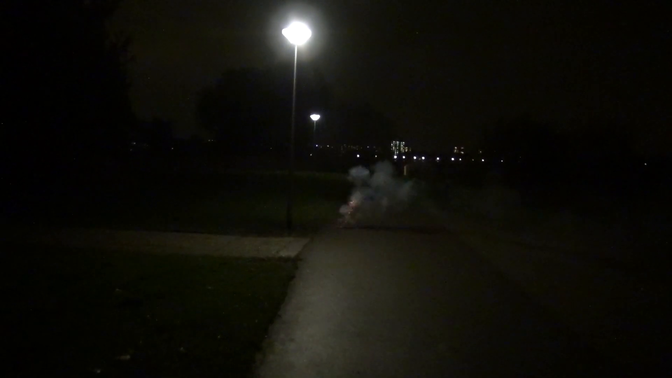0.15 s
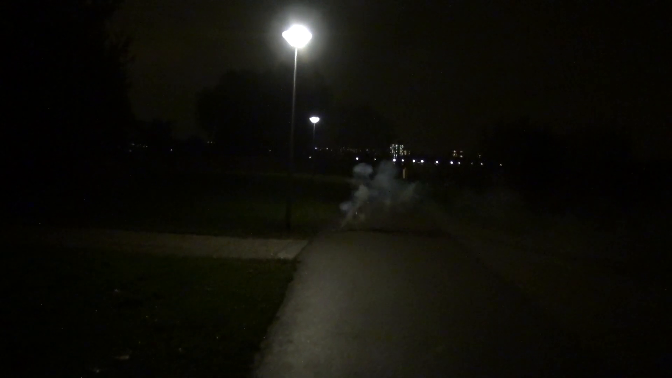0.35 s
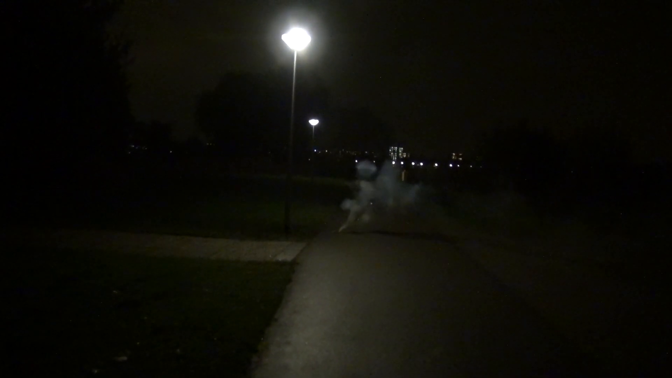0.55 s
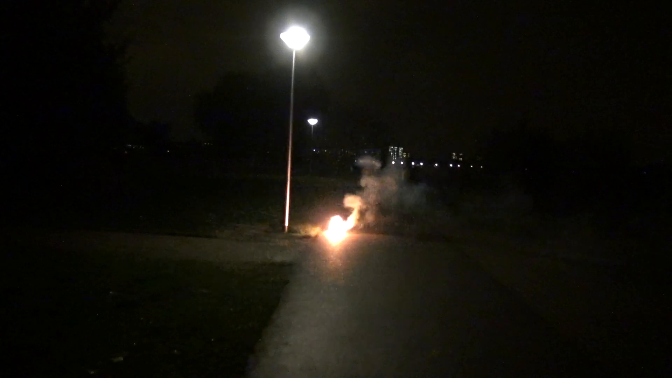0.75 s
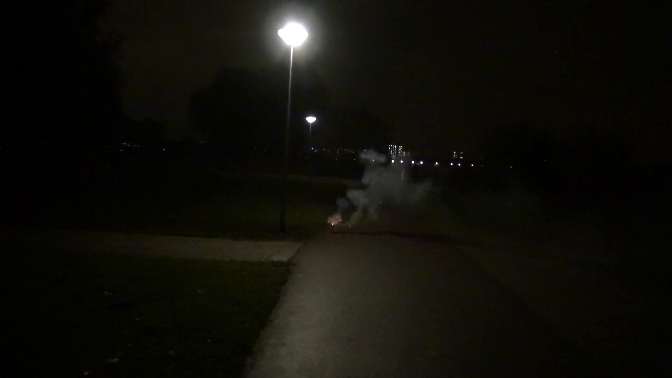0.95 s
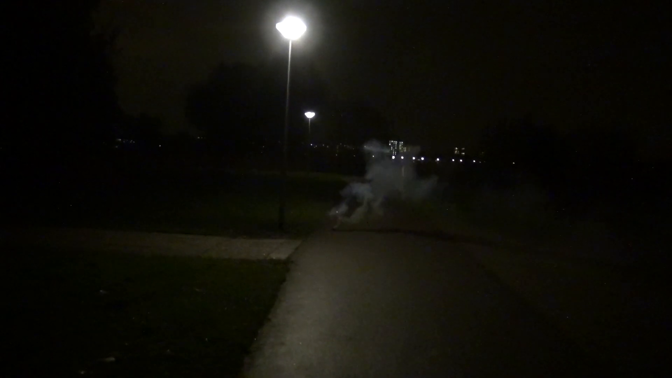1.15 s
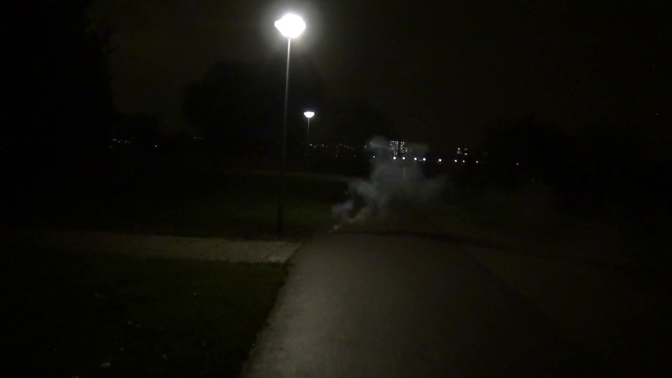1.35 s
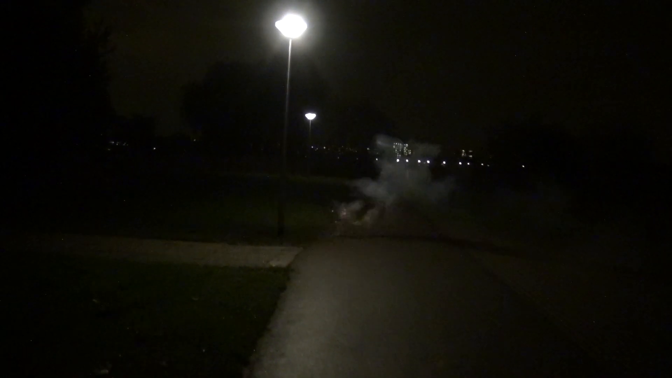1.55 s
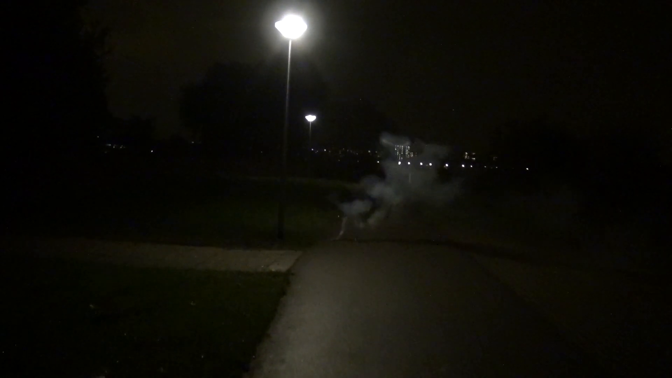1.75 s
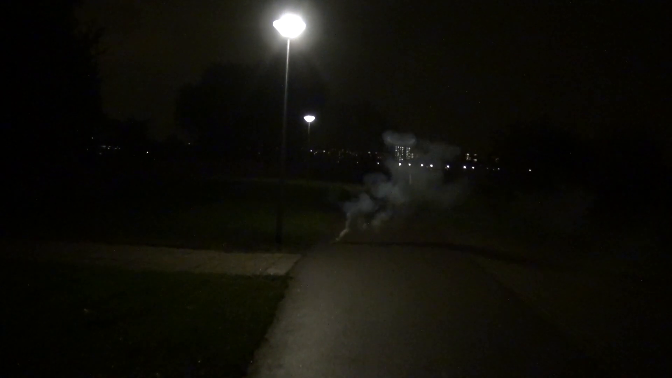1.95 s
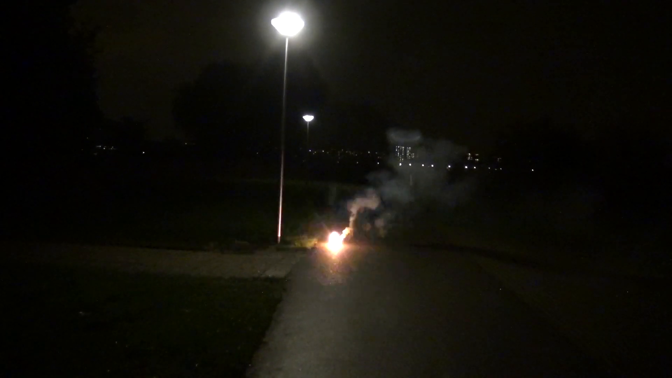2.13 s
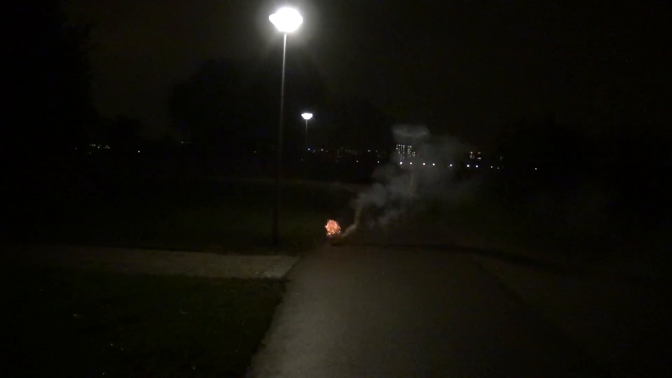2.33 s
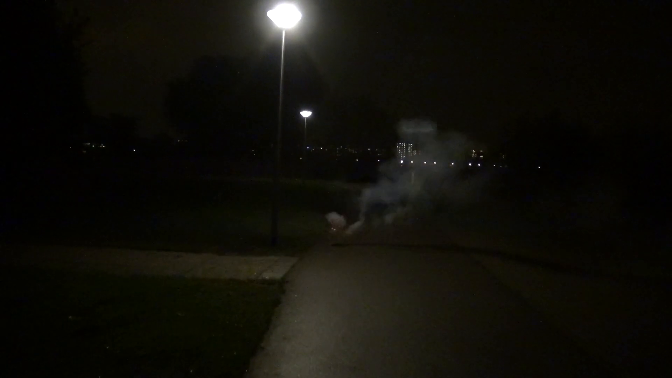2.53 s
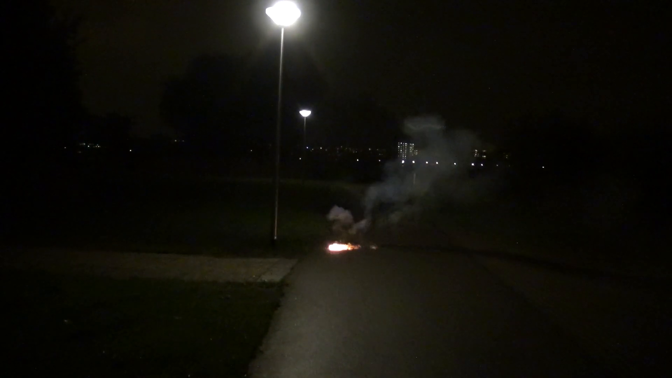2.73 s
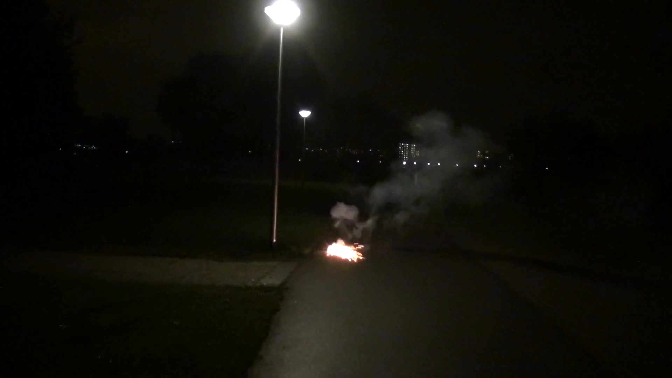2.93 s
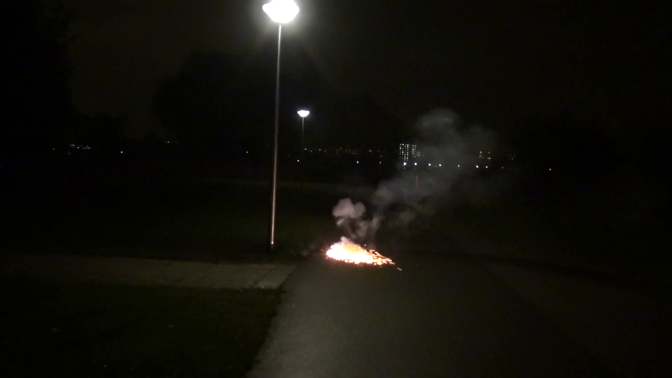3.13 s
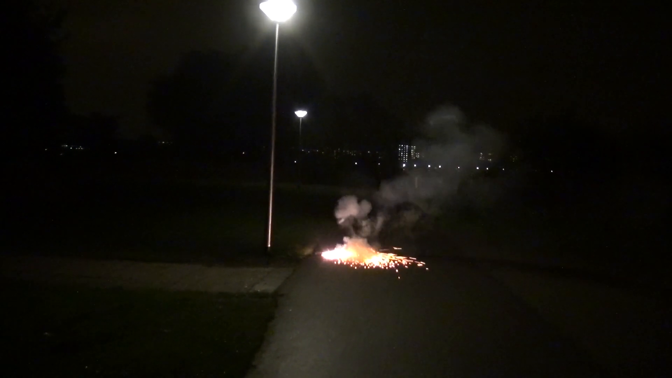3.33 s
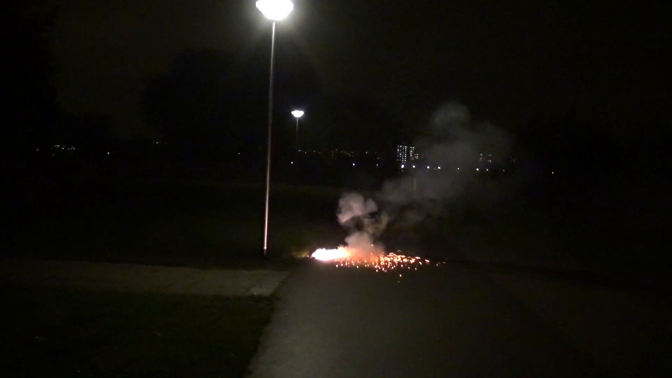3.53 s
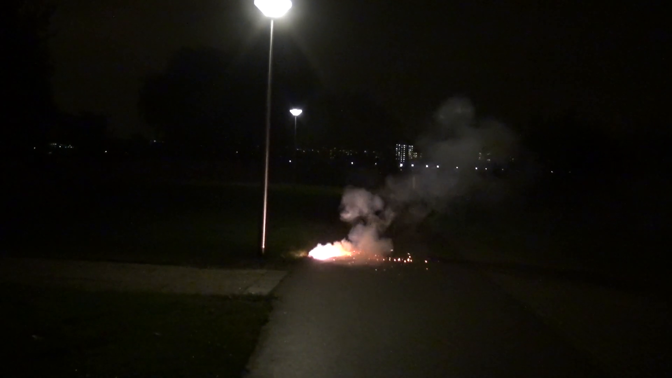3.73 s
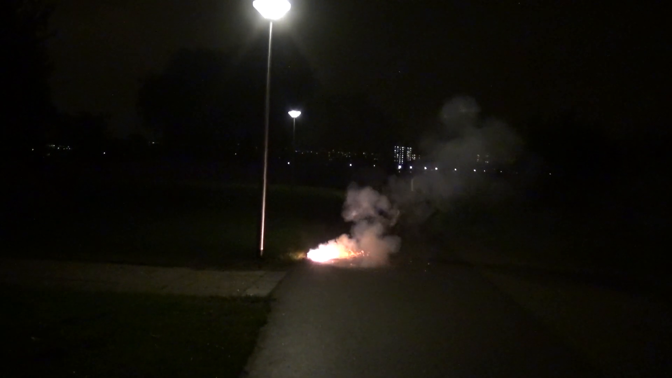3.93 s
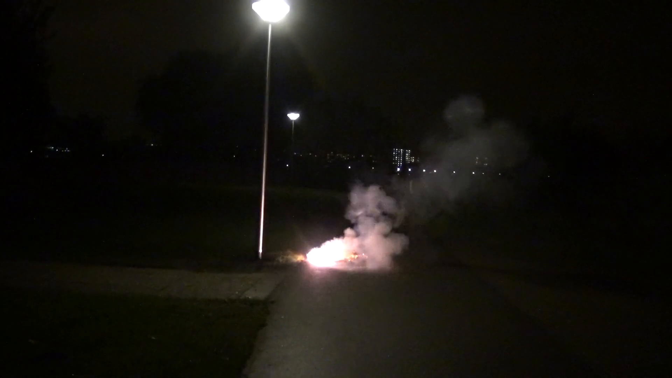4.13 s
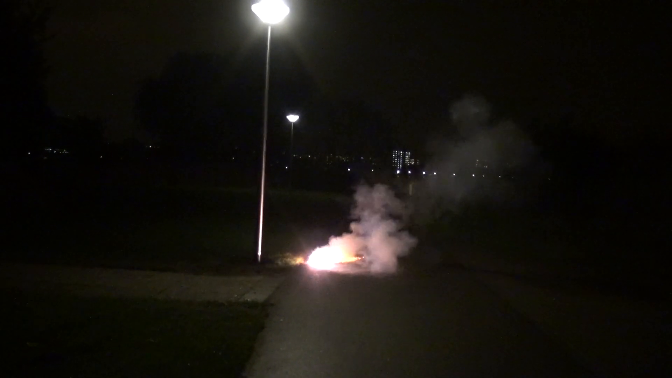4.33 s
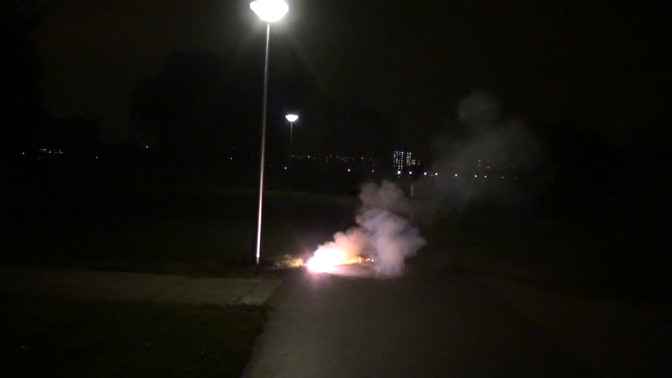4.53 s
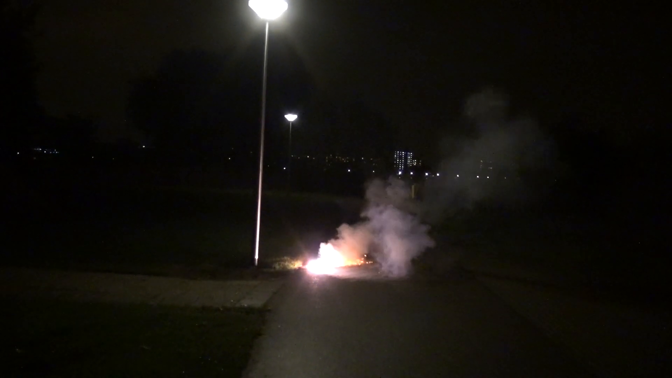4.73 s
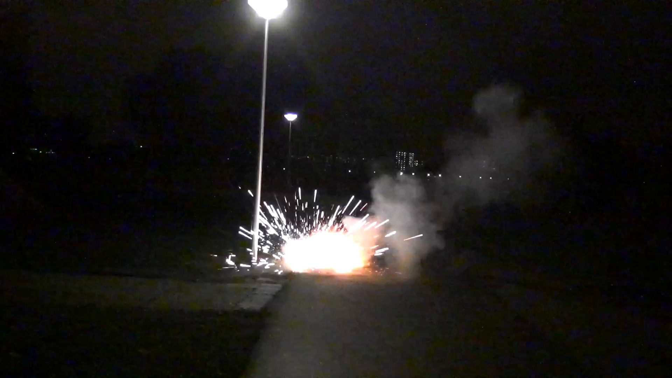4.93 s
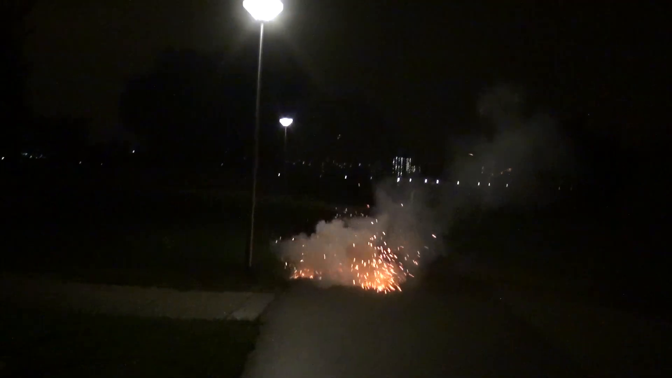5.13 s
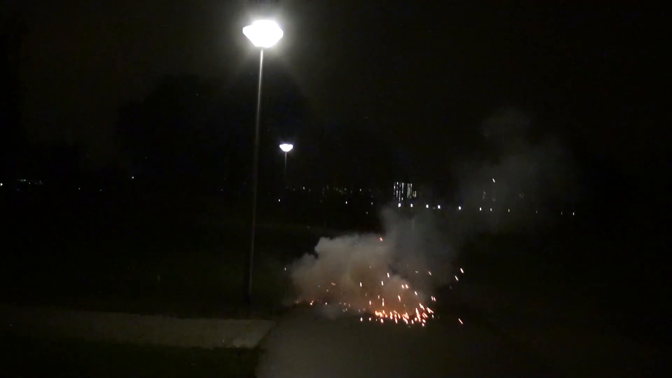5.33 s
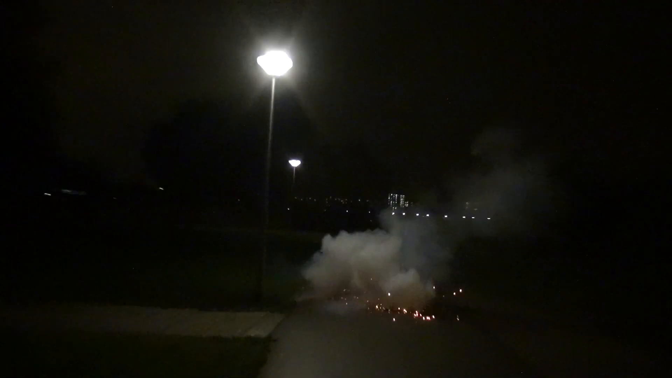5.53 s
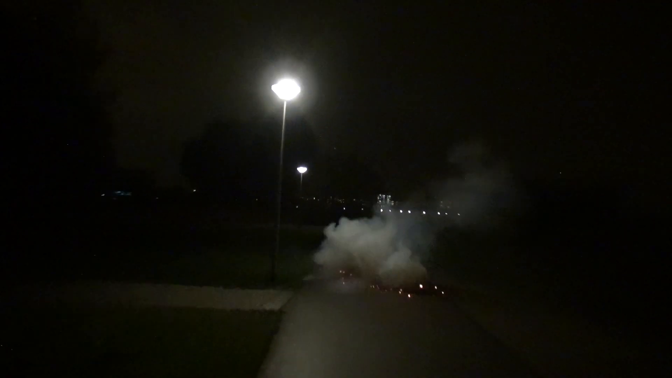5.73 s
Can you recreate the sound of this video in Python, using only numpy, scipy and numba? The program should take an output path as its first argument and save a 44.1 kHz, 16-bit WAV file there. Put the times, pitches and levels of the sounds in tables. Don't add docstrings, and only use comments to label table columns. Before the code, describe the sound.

An open park path at night, heard by a stereo microphone some way off, with low, bassy distant town hum. The recording opens in the echo tail of a pop just gone. Hard, dry cracks follow at about 0.8, 1.5 and 2.2 seconds, the 1.5 one a bit duller and thumpier; each returns as a dense flutter from posts and trees, then fainter, duller slaps from far buildings. At 2.7 a lighting crack and snap start a burning jet: a brief hiss, then a fluttering mid-low roar swelling from 3.0 to 3.4 with deep coughing puffs and spitting hiss. By 3.6 it sinks to a quiet burn, with tiny bright snaps around 4.1, 4.3 and 4.7. A water bird gives a short throaty falling croak at 4.2. At 5.0 a huge clipped blast hits, the level ducks, and echoes roll, surfacing as the gain recovers, fading to hum by 6 seconds.

```python
import sys
import numpy as np
from scipy import signal
from scipy.fft import rfft, irfft
from scipy.io import wavfile
from scipy.ndimage import uniform_filter1d
from numba import njit

SR = 44100
rng = np.random.default_rng(int(sys.argv[2]) if len(sys.argv) > 2 else 0)


def to_wav(s):
    ch = np.atleast_2d(s).T
    pcm = np.round(np.clip(ch, -1, 1) * 32767)
    wavfile.write(sys.argv[1], SR, pcm.astype(np.int16))


def convert_level_to_amplitude(level_db):
    exponent = np.asarray(level_db, float) / 20
    return 10 ** exponent


N = 254898
SPREAD = np.array([[1], [-1]])


def level(x, db):
    return x * convert_level_to_amplitude(db) / np.sqrt(np.mean(x ** 2))


def curves(table, count=N):
    s, *columns = np.transpose(table)
    return [np.interp(np.arange(count) / SR, s, c) for c in columns]


def band(x, low_hz, high_hz, order=1):
    edges_hz = [low_hz, min(high_hz, 0.45 * SR)]
    return signal.sosfilt(signal.butter(order, edges_hz, "band", fs=SR, output="sos"), x)


def coloured(*spectra):
    log_hz = np.log(np.maximum(np.fft.rfftfreq(N, 1 / SR), 1))
    db = 0
    for spectrum in spectra:
        knot_hz, knot_db = np.transpose(spectrum)
        db = db + np.interp(log_hz, np.log(knot_hz), knot_db)
    return irfft(rfft(rng.standard_normal(N)) * convert_level_to_amplitude(db), N)


def walk(rate_hz):
    hold = int(SR / rate_hz)
    steps = np.repeat(rng.standard_normal(N // hold + 1), hold)
    return 0.59 * uniform_filter1d(uniform_filter1d(steps, hold), hold)[:N]


def sides(pan_db):
    return convert_level_to_amplitude(np.array([pan_db, -pan_db]) / 2)


def shock(decay_ms):
    t = np.arange(1024) / (decay_ms * SR / 1000)
    return (1 - t) * np.exp(-t)


def shocks():
    # (time [s], direct level [dB], level sent round the place [dB], crack length [ms], thump level [dB])
    charges = [
        (-.0615, 14, -4.5, 0.092, -25),
        (0.8216, 13, -1.5, 0.11, -31.5),
        (1.5222, 9, -8, 0.12, -17),
        (2.224, 13.5, -1.5, 0.1, -30),
        (2.7195, 12.5, -17.5, .2, -18),
        (4.997, 55.5, 23, 0.2, -10.5),
    ]
    # (frequency [Hz], width [Hz], level [dB])
    heave_modes = [(196.4, 180, 3.5), (504, 790, 4.5)]
    lead = SR // 10
    direct, (cracks, thumps) = np.zeros((2, 2, N + lead))
    ms = np.arange(1024) * 1000 / SR

    boom_db, boom_hz, boom_ms = 5.5, 126.3, 3.07
    boom = -convert_level_to_amplitude(boom_db) * ms * np.exp(-ms / boom_ms) * np.cos(2 * np.pi * boom_hz * ms / 1000)

    heave = 0
    for hz, width_hz, db in heave_modes:
        decay = np.exp(-np.pi * width_hz * ms / 1000)
        heave = heave + convert_level_to_amplitude(db) * decay * np.sin(2 * np.pi * hz * ms / 1000)
    heave = band(heave, 96, 4600, order=2)

    for s, direct_db, sent_db, crack_ms, thump_db in charges:
        swing_hz = 1256 * (0.0937 / crack_ms) ** 0.47
        glide_ms, decay_ms = 1.51 * (swing_hz / 1000) ** 3.4, 1.06 * 1000 / swing_hz
        phase = 2 * np.pi * swing_hz / 1000 * glide_ms * np.log(1 + ms / glide_ms)
        swing = convert_level_to_amplitude(-4.5) * np.exp(-ms / decay_ms) * np.sin(phase + 2.0)

        tearing = rng.standard_normal(1024) + 0.24 * rng.standard_normal((2, 1024))
        rasp = convert_level_to_amplitude(-8) * np.exp(-ms / 0.43) * band(tearing, 310, 5500) * 2

        at = int(s * SR) + lead
        here = slice(at, at + 1024)
        push_db = sent_db + thump_db
        direct[:, here] += convert_level_to_amplitude(direct_db) * (shock(crack_ms) + swing + rasp)
        direct[:, here] += convert_level_to_amplitude(push_db) * boom - convert_level_to_amplitude(push_db + 9.5) * heave * np.exp(-ms / 6.0)
        cracks[here] += convert_level_to_amplitude(sent_db) * shock(crack_ms)
        thumps[here] += convert_level_to_amplitude(push_db + 6.0) * heave

    crack_back, thump_back = place()
    echoes = signal.fftconvolve(cracks[None], crack_back, axes=1)
    echoes = echoes + signal.fftconvolve(thumps[None], thump_back, axes=1)
    return (direct + echoes[:, :N + lead])[:, lead:]


def place():
    # (delay [s], crack [dB], thump [dB], left minus right [dB], highest frequency [Hz])
    near = [(.0033, 2.5, 7.5, 5.5, 4000), (.0124, 0, -7, -4, 7300), (.016, -5.5, -37, -6, 7100),
            (.0227, 0, -9.5, -4, 3500), (.0355, -40, 2.5, -11, 4100), (0.04, -5, -18, 31, 4990),
            (.047, -11.5, -4, 29, 2520), (.063, -11, -30, -6, 3900), (0.081, -4.5, 5, 19, 3800),
            (.084, 3, -41, 11.5, 4560), (0.086, -32, 7.5, 17, 3000), (0.0959, -2, 2, -6, 3600),
            (.1042, -37, -17, -4, 7500), (0.112, -32, -6, 27, 5050), (.146, -27, -27, 34.5, 3400),
            (0.1502, -8, -53, 6, 7600), (0.181, -8, -38.5, 10.5, 1540), (0.2027, -18, -42, 13, 5840),
            (0.2194, -25, -50, 14, 4730)]
    # (delay [s], crack [dB], thump [dB])
    buildings = [(.331, -29, -20), (0.345, -50.5, -11.5), (0.361, -20, -16.5), (0.396, -49, -23),
                 (.403, -25, -12.5), (.429, -28, -24), (.465, -34.5, -40), (.502, -33.5, -18),
                 (.5455, -33.5, -56), (.634, -35, -36), (.670, -36.5, -27.5)]
    far = []
    for s, crack_db, thump_db in buildings:
        high_hz = 900 + 3160 * np.exp((0.36 - s) / 0.099)
        far.append((s, crack_db, thump_db, -0.5, high_hz))

    crack, thump = scatter(size=SR)
    for s, crack_db, thump_db, pan_db, high_hz in list(near) + far:
        ms = s * 1000
        shared, own = rng.standard_normal(1024), rng.standard_normal((2, 1024))
        smear = np.exp(-np.arange(1024) / (8 + 0.55 * ms)) * 0.24 * (shared + 0.7 * own)
        smear[:, 0] = 1 / (1 + ms / 90)
        face = band(smear, 440, high_hz, order=2) * np.sqrt(8000 / high_hz)
        at = int(ms * SR / 1000)
        crack[:, at:at + 1024] += convert_level_to_amplitude(crack_db) * sides(pan_db)[:, None] * face
        thump[:, at] += convert_level_to_amplitude(thump_db) * sides(0.58 * pan_db)
    return crack, thump


def scatter(size):
    # (delay [s], density [dB])
    density = [(0, -16), (.028, -29.5), (.04, -20), (.09, -21.5), (.2, -30), (.33, -41.5), (.375, -39),
               (.58, -44.5), (.68, -51.5)]
    # (frequency [Hz], level [dB])
    foliage = [(300, -25), (600, -1), (1200, -0.5), (2400, -1), (4800, -2.5), (8000, 0), (12000, -5.5),
               (17000, -6)]
    s = np.arange(size) / SR
    middle_db = curves(density, count=size)[0]
    air_loss_db = 2.5 + 24.5 * s ** 2

    verge_db, verge_fall_db_s, trees_s, bass_db = -11, 2500, 0.062, -10.5
    bass = convert_level_to_amplitude(verge_db - verge_fall_db_s * s) + (s > trees_s) * convert_level_to_amplitude(middle_db + bass_db)

    clumps_db = 3.13 * walk(190)[:size] + 0.95 * walk(45.8)[:size]
    mid, side = rng.standard_normal((2, size)) * convert_level_to_amplitude(clumps_db)
    log_hz = np.log(np.maximum(np.fft.rfftfreq(size, 1 / SR), 150))
    centres = np.log([150, *np.array(foliage)[:, 0]])
    crack = 0
    for (hz, db), one in zip(foliage, np.eye(len(centres))[1:]):
        ears = mid + 0.25 * (hz / 2000) ** 0.5 * SPREAD * side
        layer = irfft(rfft(ears) * np.interp(log_hz, centres, one), size)
        crack = crack + convert_level_to_amplitude(middle_db + db - air_loss_db * (hz / 6000) ** 1.29) * layer
    pan = sides(3)[:, None]
    return crack * pan, convert_level_to_amplitude(1.0) * bass * pan * (mid + 0.25 * SPREAD * side)


def jet():
    # (time [s], roar level [dB], hiss above roar [dB])
    burn = [
        (2.73, -22.5, 2),
        (2.75, -37, -4.5),
        (2.9, -33.5, -12.5),
        (3.22, -28.5, -17.5),
        (3.3, -27.5, -10),
        (3.4, -27.5, -9),
        (3.46, -33.5, -18),
        (3.62, -45, -15),
        (4.98, -49, -9),
    ]
    # (frequency [Hz], density [dB per Hz])
    roar_spectrum = [(180, -13), (300, -7.5), (576, 5), (768, 1.5), (1240, 1.5), (1920, -6.5), (2120, -8.5),
                     (6000, -39.5), (7800, -69), (13200, -120)]
    # (frequency [Hz], density [dB per Hz])
    hiss_spectrum = [(1180, -62), (2000, -16), (2360, -1), (3550, -5), (8050, -11), (14000, -25.5),
                     (16000, -44)]
    roar_db, hiss_db = curves(burn)
    rumble_db = -41.5 - roar_db + 0.3 * (roar_db + 46) + 3 * walk(14)
    t = np.arange(N) / SR
    alight = np.clip((t - burn[0][0]) / 0.018 + 1, 0, 1) * np.clip((burn[-1][0] - t) / 0.081 + 1, 0, 1)

    roar = level(coloured(roar_spectrum) + 0.062 * SPREAD * coloured(roar_spectrum), 0.11)
    roar = roar * convert_level_to_amplitude(2.8 * walk(80) + 0.2 * walk(51))
    hiss = level(coloured(hiss_spectrum) + 0.19 * SPREAD * coloured(hiss_spectrum), 1.0)
    hiss = hiss * convert_level_to_amplitude(0.14 * walk(25.8))
    rumble = level(band(rng.standard_normal(N), 111, 430, order=2), -2.0)
    sizzle = level(band(rng.standard_normal((2, N)), 7000, 15500, order=2), -60.5)

    flame = roar + convert_level_to_amplitude(hiss_db) * hiss + convert_level_to_amplitude(rumble_db) * rumble
    return alight * (convert_level_to_amplitude(roar_db) * sides(0.4)[:, None] * flame + sizzle)


def puffs():
    # (time [s], peak level [dB], frequency [Hz])
    coughs = [
        (2.994, -20, 420),
        (3.195, -19, 266),
        (3.228, -14.5, 202),
        (3.283, -17.5, 296),
        (3.316, -20, 192),
        (3.405, -26, 210),
    ]
    swings = 1.2
    out, t = np.zeros(N), np.arange(1024) / SR
    for s, db, hz in coughs:
        at = int(s * SR)
        out[at:at + 1024] -= convert_level_to_amplitude(db - 1.5) * np.exp(-t * hz / swings) * np.sin(2 * np.pi * hz * t)
    return out


def sparks():
    # (time [s], peak level [dB], centre frequency [Hz])
    snaps = [
        (0.635, -47, 6100),
        (2.7143, -28, 1760),
        (2.864, -51, 7400),
        (4.1, -32.5, 6040),
        (4.32, -36, 4800),
        (4.708, -33, 8000),
        (4.834, -42, 7800),
    ]
    out = np.zeros(N)
    for s, db, hz in snaps:
        at = int(s * SR)
        out[at:at + 1024] += convert_level_to_amplitude(db + 16.0) * band(shock(0.015), hz / 1.8, hz * 1.5)
    return out


def bird():
    # (time [s], pitch [Hz], level [dB])
    call = [
        (4.2, 1604, -63),
        (4.215, 1690, -37.5),
        (4.24, 1570, -36.5),
        (4.265, 1460, -42),
        (4.285, 1480, -47),
    ]
    hz, db = curves(call)
    t = np.arange(N) / SR
    throb = (t - 4.211) * 78 % 1
    phase = 2 * np.pi * np.cumsum(hz * (1 + 0.18 * (throb - 0.5))) / SR
    swell = (t > call[0][0]) * (t < call[-1][0]) * convert_level_to_amplitude(db)
    voice = np.sin(phase) + convert_level_to_amplitude(-16) * np.sin(2 * phase)
    return swell * (0.3 + np.sin(np.pi * throb) ** 2) * voice


def town():
    # (frequency [Hz], density [dB per Hz])
    hum_spectrum = [(15, -4.5), (25, 0), (127, -7), (198, -11.5), (248, -20), (500, -21), (1030, -20),
                    (2400, -32.5), (4000, -40.5), (8000, -43.5), (12000, -49), (16000, -47)]
    # (frequency [Hz], side minus mid [dB])
    side_spectrum = [(60, -9.5), (250, -3), (1000, -1.5), (4000, -4.5), (15000, -5)]
    hum = coloured(hum_spectrum) + SPREAD * coloured(hum_spectrum, side_spectrum)
    hum = level(hum, -41)
    bass = band(hum, 15, 200)
    return hum + bass * (convert_level_to_amplitude(1.5 * walk(6)) - 1)


@njit
def follow(x, attack, release):
    e, out = 1e-9, np.empty(len(x))
    for i in range(len(x)):
        e += (x[i] - e) * (attack if x[i] > e else release)
        out[i] = e
    return out


def scene():
    return shocks() + jet() + puffs() + sparks() + bird() + town()


def roll_off(x):
    return signal.sosfilt(signal.butter(12, 16460, fs=SR, output="sos"), x)


def record(dry):
    rest_db, duck_from_db, senses_up_to_db = 3, -3.5, 22.5
    reacts_after_s, attack_s, release_s = 0.0041, 0.0019, 0.047
    sensed = np.minimum(np.abs(dry).max(axis=0), convert_level_to_amplitude(senses_up_to_db))
    delayed = np.roll(sensed, int(reacts_after_s * SR))
    loud = follow(delayed, 1 / (attack_s * SR), 1 / (release_s * SR))
    ducked = dry * np.minimum(convert_level_to_amplitude(rest_db), convert_level_to_amplitude(duck_from_db) / loud)
    capsule = band(np.clip(ducked, -1.05, 1.05), 45, 17000)
    return roll_off(np.clip(capsule, -0.98, 0.98))


dry = scene()
out = record(dry)
to_wav(out)
```